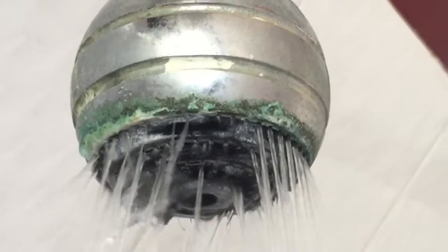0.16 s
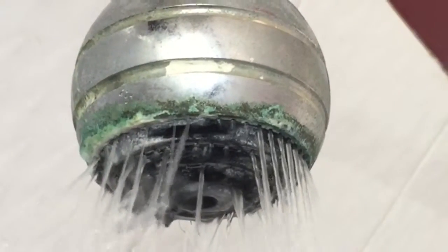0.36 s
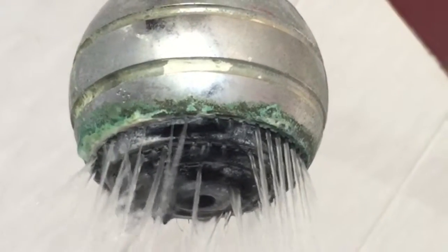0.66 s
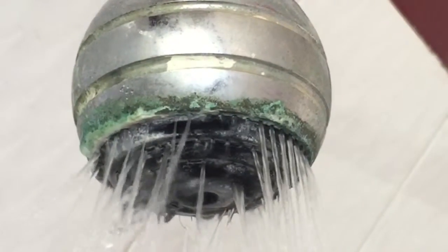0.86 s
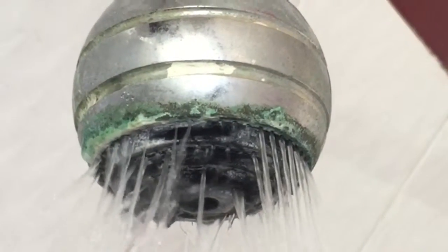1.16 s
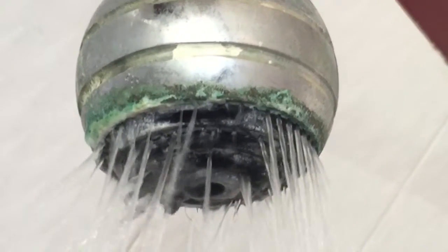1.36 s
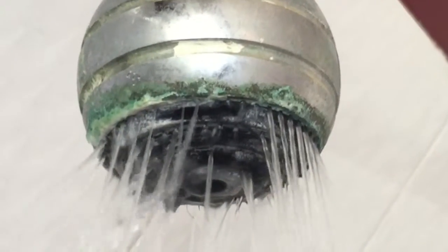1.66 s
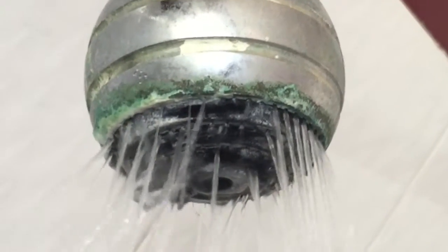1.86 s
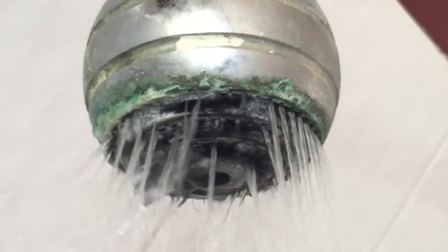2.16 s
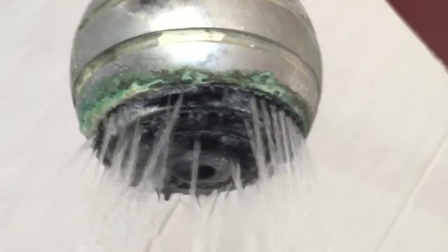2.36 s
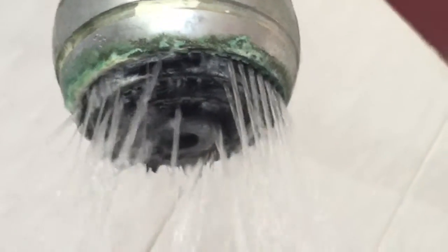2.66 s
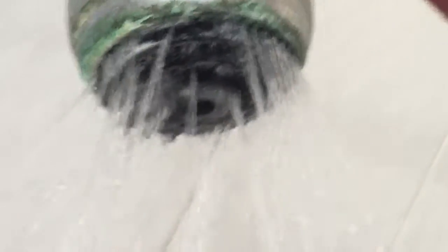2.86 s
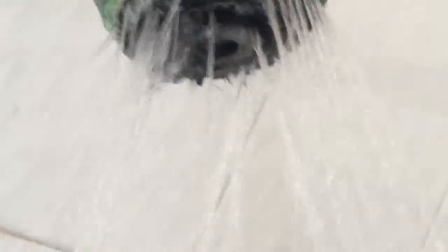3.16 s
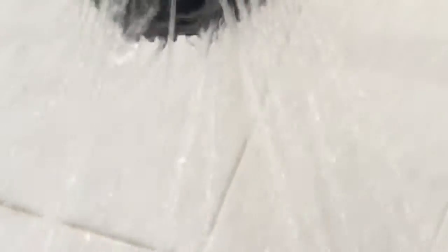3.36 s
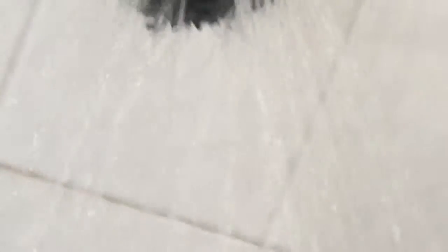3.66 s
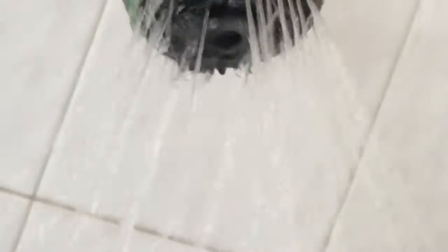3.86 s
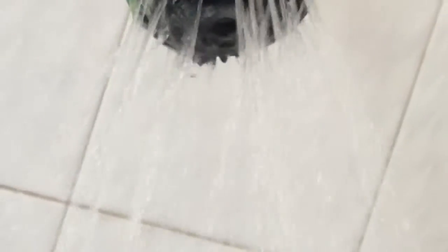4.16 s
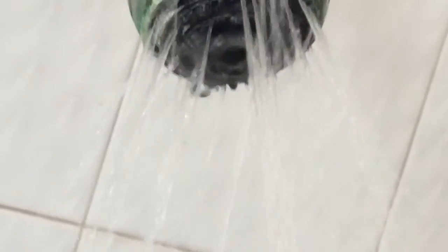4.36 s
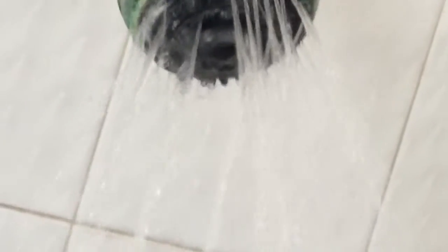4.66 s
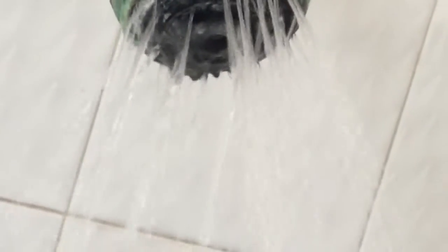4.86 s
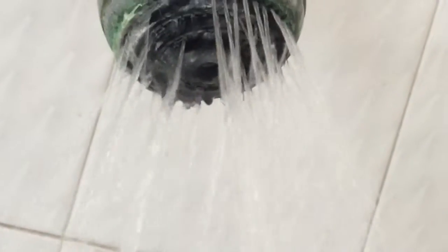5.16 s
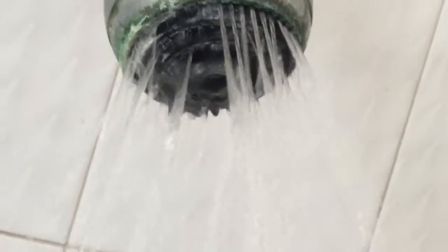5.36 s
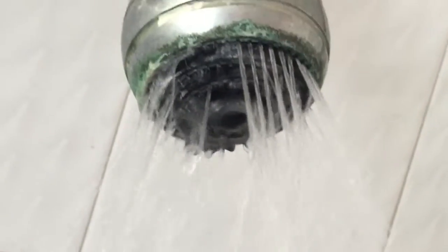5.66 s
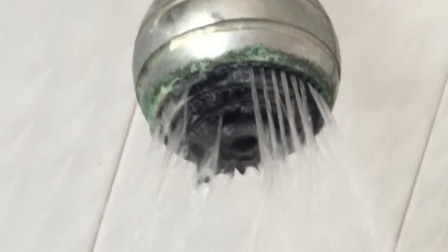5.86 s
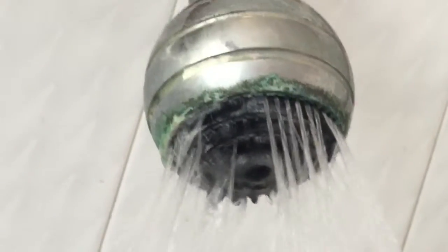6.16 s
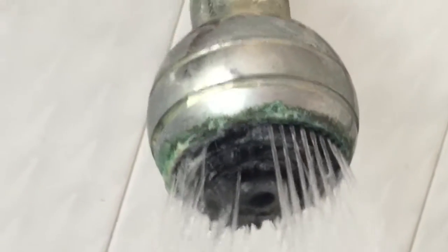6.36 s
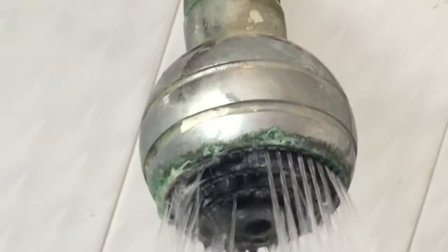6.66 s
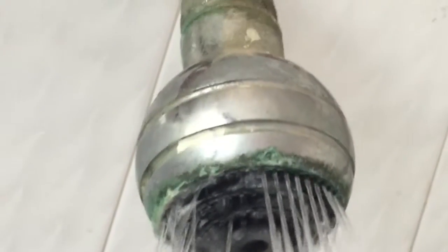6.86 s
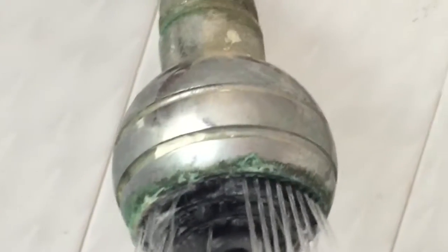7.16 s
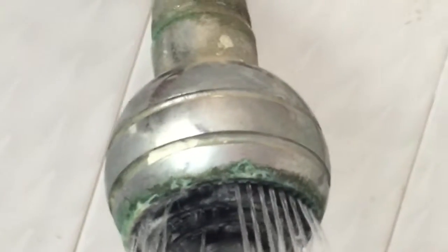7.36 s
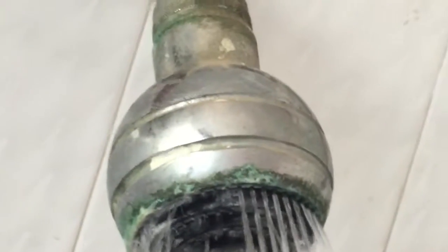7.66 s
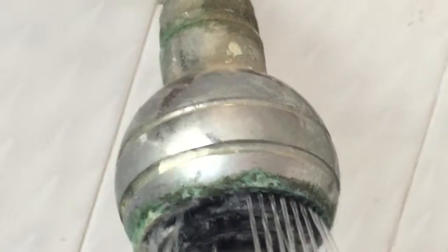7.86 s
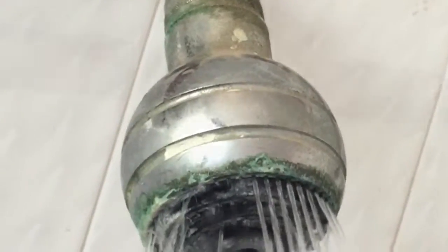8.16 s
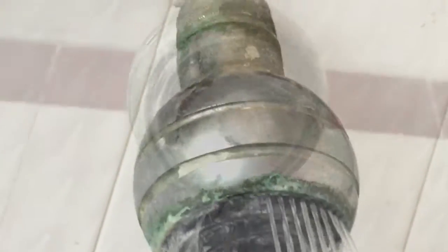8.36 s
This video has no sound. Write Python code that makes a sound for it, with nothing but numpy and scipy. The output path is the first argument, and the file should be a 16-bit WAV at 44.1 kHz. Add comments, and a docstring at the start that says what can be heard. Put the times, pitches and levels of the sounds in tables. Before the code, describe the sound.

Steady bright shower hiss and fine water patter, broken by sharp sputtering pops, with low rumble and a short tiled-room echo.

```python
"""A clogged shower head in a small tiled bathroom, heard by a phone held close.
From the first moment fine drops patter, jets hiss, low room modes rumble and air pockets burst at the holes as pops;
hard walls draw patter and pops out into a hissing tail. The pipe's faint sine whistle first swells after one second.
Stray drops fizz and plop on the phone at about 2.4, 2.6 and 4.5 s; near 3 s the jets sink briefly.
Patter is filtered clicks, hiss and fizz are filtered noise, pops are banded crackle and plops are rising sines."""
import sys
import numpy as np
from scipy import signal
from scipy.fft import rfft, irfft, next_fast_len
from scipy.io import wavfile
from scipy.ndimage import uniform_filter1d

SR = 44100
rng = np.random.default_rng(int(sys.argv[2]) if len(sys.argv) > 2 else 0)


def store_pcm(level_fs):
    """Save levels as 16-bit WAV."""
    pcm = np.round(np.clip(level_fs, -1, 1) * 32767).astype(np.int16)
    wavfile.write(sys.argv[1], SR, np.atleast_2d(pcm).T)


def amplitude_ratio(level_db):
    """Convert a level in decibels to the matching linear amplitude (field) ratio."""
    exponent = np.asarray(level_db, float) / 20
    return 10 ** exponent


N = 375732  # samples, about 8.5 s


def curve(points, hz):
    """Values of (Hz, value) points on a log-frequency axis."""
    f, v = np.transpose(points)
    return np.interp(np.log(np.maximum(hz, 1)), np.log(f), v)


def shape(x, gain):
    """Filter by a function of frequency."""
    size = next_fast_len(len(x) + 4096)
    hz = np.arange(size // 2 + 1) * SR / size
    return irfft(rfft(x, size) * gain(hz), size)[:len(x)]


def level(x, db):
    """Scale to an rms level."""
    return x * amplitude_ratio(db) / np.sqrt(np.mean(x ** 2))


def walk(rate):
    """Random levels held about 1 / rate s and slewed twice; spread near 1."""
    hold = int(SR / rate)
    steps = rng.standard_normal(N // 100)[np.arange(N) // max(hold, 101)]
    return 1.3 * uniform_filter1d(uniform_filter1d(steps, hold), hold)


# Low rumble of water in pipes and room. Each row: frequency in Hz, relative density in dB per Hz.
RUMBLE_COLOUR = [(24, -49), (40, -7.5), (81, -2.5), (129, -6), (160, 0), (212, -0.5), (246, -8),
                 (323, -7.5), (355, -14.5), (422, -9), (496, -12.5), (616, -8), (806, -12.5), (1000, -14),
                 (1300, -19), (2200, -120)]
# Room modes that stand out of it. Each row: frequency in Hz, width in Hz, rms level in dB before the swell.
ROOM_MODES = [(86.6, 4.7, -56), (108.5, 28, -57.5), (160.5, 17, -54), (210, 5.7, -60), (319.3, 2.9, -65)]


def rumble(rumble_db=-49, swell_db=1.2, cut_hz=36):
    """Broad low noise and narrow room modes fed by noise, swelling together."""
    def colour(hz):
        return amplitude_ratio(curve(RUMBLE_COLOUR, hz)) * hz ** 8 / (hz ** 8 + cut_hz ** 8)

    out = level(shape(rng.standard_normal(N), colour), rumble_db)
    for mode_hz, width_hz, db in ROOM_MODES:
        ring = shape(rng.standard_normal(N), lambda hz: 1 / (1 + (2 * (hz - mode_hz) / width_hz) ** 2))
        out = out + level(ring, db)
    return out * amplitude_ratio(swell_db * walk(4.7))


# The pipe's whistle at the phone. Each row: time in seconds, rms level in dB before the waver.
WHISTLE_LEVEL = [(0, -70), (1.05, -70), (1.12, -58), (1.35, -61), (1.5, -67), (2.3, -62), (2.6, -68),
                 (2.83, -59), (3, -69), (4.6, -67), (4.85, -59), (5.2, -62), (5.6, -64), (5.8, -70),
                 (8.52, -70)]


def whistle(whistle_hz=624, waver_db=3):
    """The pipe sings one sine whose pitch and level waver."""
    s, db = np.transpose(WHISTLE_LEVEL)
    pitch_hz = whistle_hz + 6 * walk(6) + 9 * walk(40)
    tone = np.sqrt(2) * np.sin(2 * np.pi * np.cumsum(pitch_hz) / SR)
    return tone * amplitude_ratio(np.interp(np.arange(N) / SR, s, db) + waver_db * walk(14))


# Colour shared by jets, patter and pops. Each row: frequency in Hz, relative level in dB.
SPRAY_COLOUR = [(700, -15.5), (1200, -5), (1700, -3.5), (2500, -3), (3800, -0.5), (6400, 3.5), (9000, 3.5),
                (12000, 1.5), (15500, 0.5)]
# Hiss of the jets as the flow wavers. Each row: time in seconds, rms level in dB before the flicker.
JET_LEVEL = [(0.0, -33), (0.92, -36), (1.49, -32.5), (1.8, -35), (2.49, -31.5), (2.75, -36), (2.96, -43),
             (3.11, -33), (5.5, -36.5), (5.81, -34), (6.43, -33.5), (6.55, -34.5), (6.93, -34),
             (8.52, -34.5)]


def hiss(flicker_db=1.03, low_hz=3760):
    """The jets tear out of the holes as coloured noise that fades below low_hz and follows the flow."""
    jets = shape(rng.standard_normal(N), lambda hz: amplitude_ratio(curve(SPRAY_COLOUR, hz)) * hz / np.hypot(hz, low_hz))
    s, db = np.transpose(JET_LEVEL)
    return level(jets, 0) * amplitude_ratio(np.interp(np.arange(N) / SR, s, db) + flicker_db * walk(6.5))


def patter(count=25000, scatter_db=4, patter_db=-60, rarest_drop=.002):
    """Fine drops strike tile and water film: dense clicks of uneven size, levelled ahead of the room."""
    moment, size, side = rng.random((count, 3)).T
    # the chance of the largest drop caps the sizes
    strength = amplitude_ratio(-scatter_db * np.log(np.maximum(size, rarest_drop)))
    drops = np.zeros(N)
    np.add.at(drops, (moment * N).astype(int), np.sign(side - .5) * strength)
    return level(shape(drops, lambda hz: amplitude_ratio(curve(SPRAY_COLOUR, hz))), patter_db)


# Bubbles left by drops on the phone.
# Each row: start in seconds, starting pitch in Hz, level in dB of half the peak before attack and decay.
PLOP_BUBBLES = [(2.368, 1234, -35.5), (2.605, 1360, -35), (4.456, 1210, -39), (4.518, 1930, -35)]


def plops(t60_s=.035, rise_per_s=5, attack_ms=2):
    """Each bubble rings briefly and rises as it nears the surface."""
    out = np.zeros(N)
    t = np.arange(SR // 10) / SR
    for s, hz, db in PLOP_BUBBLES:
        fade = (1 - np.exp(-1000 * t / attack_ms)) * amplitude_ratio(db - 60 * t / t60_s)
        ring = np.sin(2 * np.pi * hz * t * (1 + rise_per_s * t / 2))
        start = int(s * SR)
        out[start:start + len(t)] += 2 * fade * ring
    return out


# Drops hitting the phone. Each row: start in seconds, length in ms, rms level in dB before the roughness.
PHONE_HITS = [(2.3687, 5.1, -24), (2.414, 5.3, -30), (2.6038, 20.6, -21), (2.6225, 3.6, -36),
              (4.458, 2.4, -15.5), (4.462, 6.9, -24), (4.517, 7.3, -29)]
# Colour of their fizz at the phone. Each row: frequency in Hz, relative level in dB.
FIZZ_COLOUR = [(800, -28), (1350, -10), (1600, -14), (7000, -12), (10000, -2), (12500, 0), (15500, -7)]


def splats(edge_ms=.7, rough_db=1.5):
    """Stray drops break up on the phone itself: short gated noise, dry and fizzy."""
    t_ms = np.arange(N) / SR * 1000
    fizz = level(shape(rng.standard_normal(N), lambda hz: amplitude_ratio(curve(FIZZ_COLOUR, hz))), 0)
    gate = np.zeros(N)
    for s, length_ms, db in PHONE_HITS:
        to_edge_ms = np.minimum(t_ms - 1000 * s, 1000 * s + length_ms - t_ms)
        gate += amplitude_ratio(db) * np.clip(to_edge_ms / edge_ms, 0, 1)
    return fizz * gate * amplitude_ratio(rough_db * walk(440))


def bursts(table, size=4096, ripple_db=1.5, ripple_hz=500, band_reach=1.636):
    """Each pocket bursts with a click or sputters out over some ms; its size sets the band it sounds in."""
    s, db, pitch_hz, half_width_oct, sputter_ms = np.transpose(table)[:, :, None]
    hz = np.maximum(np.arange(size // 2 + 1), 1) * SR / size
    lead = size // 8
    t = (np.arange(size) - lead) / SR
    chance = rng.standard_normal((len(table), size))
    decay = np.exp(-1000 * np.abs(t) / np.maximum(sputter_ms, .1)) * (t > 0)
    push = chance ** 3 / 10 * decay  # sparse crackle
    push[:, lead] = 2 * np.sign(chance[:, 0])  # the opening click
    timing = rfft(push)
    timing /= np.abs(timing)  # the crackle sets when the energy comes, the pocket sets its colour
    # band_reach: half widths out to where the flat band falls away
    off = np.log2(hz / pitch_hz) / (band_reach * half_width_oct)
    bell = 1 / (1 - off ** 2 + 1j * np.sqrt(2) * off)  # a pair of close resonances: flat top, steep edges
    tint = amplitude_ratio(db + curve(SPRAY_COLOUR, hz) - curve(SPRAY_COLOUR, pitch_hz))
    # several bubbles share a pocket, so its band is uneven
    bins = max(int(ripple_hz * size / SR), 2)
    ripple = uniform_filter1d(rng.standard_normal(timing.shape), bins)
    ripple = uniform_filter1d(ripple, bins) * np.sqrt(bins)
    sounds = irfft(timing * bell * tint * amplitude_ratio(ripple_db * ripple), size)
    out = np.zeros(N + 2 * size)
    starts = (s[:, 0] * SR).astype(int) + size - lead
    for start, sound in zip(starts, sounds):
        out[start:start + size] += sound
    return out[size:size + N]


def small_pops(count=300, loudest_db=-16.5, scatter_db=10):
    """Many lesser pockets of any size burst at chance moments."""
    moment, quiet, high, wide, slow = rng.random((count, 5)).T
    db = loudest_db - scatter_db * quiet
    pitch_hz = 3500 * 2 ** (2.2 * np.sqrt(high))  # the tiniest, highest ones are the most common
    half_width_oct = .15 + .17 * wide
    sputter_ms = 6 * slow
    return bursts(np.c_[moment * N / SR, db, pitch_hz, half_width_oct, sputter_ms])


# Air pockets bursting at the holes, close to the phone.
# Each row: start in seconds, spectral peak in dB before ripple and room, pitch in Hz,
# half width in octaves, sputter decay in ms.
POCKETS = [(0.0, -6.5, 3500, 0.31, 3.8), (0.0704, -18, 13900, .6, 8), (0.106, -13, 4900, 0.73, 0.81),
           (0.2166, -9, 3630, 0.34, 5), (0.2775, -5, 2800, 0.28, 4.6), (0.3555, -2, 2880, 0.27, .6),
           (0.4317, -7.5, 3900, 0.33, 1.3), (0.483, -9, 3360, 0.27, 0.71), (0.5906, -10, 6800, 0.91, 1.6),
           (0.88, -17, 6400, 0.55, 16), (0.8969, -5, 3200, 0.35, 4.6), (1.1008, -10, 6470, 0.38, 9),
           (1.1804, -8.5, 9190, 0.65, 1.2), (1.3624, -9, 4520, 0.35, 1.6), (1.4418, -6, 5700, 0.42, .5),
           (1.4962, -7.5, 2980, 0.4, 1.2), (1.574, -9.5, 4360, 0.34, 1.1), (1.6324, -14, 11310, 0.8, 5),
           (1.7029, -17, 7210, 0.38, 1), (1.8209, -8, 3460, .25, 1.9), (2.0127, -6, 4760, 0.48, 0.81),
           (2.0424, -4.5, 2520, 0.29, 1.2), (2.075, -3, 4400, 0.39, 6.8), (2.1413, -5, 3840, 0.31, 0.9),
           (2.2341, -19, 9190, 0.64, 1), (2.295, -16, 4590, 0.47, 6), (2.3525, -3, 3550, 0.49, 2.3),
           (2.3679, -2.5, 2510, 0.052, 0.87), (2.418, -9.5, 13450, 0.33, 5.5),
           (2.4768, -4.5, 2960, 0.34, 3.5), (2.5285, -2.5, 3450, 0.36, 5.1), (2.626, -14, 10560, .93, 7.4),
           (2.7959, -8, 3400, 0.24, 3.7), (2.7979, -15, 13450, .2, 1), (2.9284, -6.5, 10200, 0.82, 100),
           (2.9771, 0.5, 2600, 0.27, .3), (3.0304, -7, 8800, 0.59, 0.85), (3.2034, -14.5, 5500, 0.79, 13),
           (3.256, -11.5, 4300, 0.39, 1.4), (3.3359, -13.5, 1610, 0.5, 16), (3.3643, -13, 1350, 0.081, 1.2),
           (3.442, -14, 4270, 0.13, 2.3), (3.4748, -12, 11310, 1, 1.2), (3.628, -17, 9510, 1, 1),
           (3.7393, -3, 11700, 0.26, .45), (3.7665, -11, 3350, 0.38, 0.46),
           (3.8098, -16.5, 2530, 0.79, 1.1), (3.8447, -3, 3130, 0.093, 4), (3.9879, -22, 11310, 0.46, 1.2),
           (4.077, -12.5, 4300, 0.35, 1), (4.1414, -2.8, 3200, 0.23, .6), (4.1647, -10.5, 7800, 0.72, .9),
           (4.2818, -14, 4590, 0.67, .8), (4.3439, -9.5, 6730, 0.23, 1.1), (4.446, -10.5, 10600, 1, 5.9),
           (4.5961, -1.5, 3980, 0.3, .4), (4.9088, -11.5, 7210, 0.8, 0.54), (5.0806, -4.5, 5500, 0.6, .43),
           (5.161, -8, 4640, 0.18, .5), (5.3433, -15.5, 5470, 0.65, 6.3), (5.4964, -17, 12500, 0.49, 2.7),
           (5.6125, -11, 11310, .67, 11), (5.6511, -8.5, 3420, 0.29, 5.8), (5.7, -12.5, 3970, 0.38, 8),
           (5.7846, -14, 12130, 0.38, 1), (5.93, -11, 6500, 0.57, 8), (5.9426, -4.5, 4300, 0.36, 31),
           (6.0297, -12, 4220, 0.53, 1.2), (6.196, -11, 3650, 0.19, 2), (6.225, -12, 4140, .38, 2.5),
           (6.2697, 0.5, 2520, 0.24, 0.34), (6.3213, -17.5, 2430, 0.94, 6.1), (6.322, -8.5, 6500, 0.37, 1),
           (6.4923, -4.5, 3570, 0.35, 0.45), (6.4982, -9, 10560, 0.28, 0.87),
           (6.6736, -8.5, 3500, 0.3, 2.5), (6.707, -5, 6700, .3, 2.2), (6.7879, -10.5, 6900, 0.61, 16),
           (6.8582, -13, 11900, .72, 1), (7.0602, -12.5, 6730, 0.64, 1.2), (7.1078, -17, 2260, 0.53, 4.4),
           (7.1529, -13.5, 13450, .95, .75), (7.2378, -8, 5280, 0.64, 15), (7.3171, -9.5, 5280, 0.42, 1.1),
           (7.4581, -10, 4800, 0.45, 1.1), (7.532, -13.5, 2750, 0.53, 4.1), (7.5896, -9, 5150, 0.25, 2),
           (7.708, -14.5, 13450, 0.55, 2), (7.7199, -12, 2480, 0.14, 1.6), (7.7215, -8, 4360, .19, 0.85),
           (7.8651, -12.5, 8500, .72, 9.4), (7.9327, -13, 4800, 0.59, 0.89), (8.101, -8.5, 4950, 0.28, 13),
           (8.2074, -13, 4470, 0.69, 0.92), (8.2693, -13, 10930, 0.96, 4.2),
           (8.4792, -16.5, 13000, 0.27, 1)]


def pops():
    """The larger air pockets burst at the nozzle holes, each at its own moment and pitch."""
    return bursts(POCKETS)


# First clear paths from the shower head to the phone.
# Each row: delay in ms before the hand's drift, level in dB.
FIRST_PATHS = [(0, 2), (.65, 3), (3.4, 0), (7.4, -5), (13.3, -1), (19, -5)]
# Reverberation of the tiled room. Each row: frequency in Hz, time to fall by 60 dB in seconds.
ROOM_DECAY = [(1200, 0.77), (2400, 0.8), (4800, 0.6), (9600, 0.44), (15000, 0.2)]


def bathroom(x, tail_db=-14.5, rise_ms=3, grain_ms=40, drift=0.049, size=4096):
    """A few clear paths, then echoes that thicken and fade, treble first; the hand drifts, so they change."""
    t = np.arange(SR * 4 // 5) / SR
    noise, gate = rng.standard_normal((2, len(x) + len(t)))
    bands = []
    for k in range(len(ROOM_DECAY)):
        share = [(f, float(j == k)) for j, (f, _) in enumerate(ROOM_DECAY)]  # one band, crossfaded
        bands.append(shape(noise, lambda hz: curve(share, hz)))
    bands = np.array(bands)
    rise = 1 - np.exp(-(1000 * t / rise_ms) ** 2)
    fades = amplitude_ratio(tail_db - 60 * t / np.array(ROOM_DECAY)[:, 1:]) * rise
    out = np.zeros(len(x) + len(t) + size)
    for i in range(0, len(x), size):
        lumpy = amplitude_ratio(4 * gate[i:i + len(t)] * np.exp(-1000 * t / grain_ms))  # early echoes are uneven
        lumpy /= np.sqrt(uniform_filter1d(lumpy ** 2, 400))
        tail = lumpy * np.sum(bands[:, i:i + len(t)] * fades, axis=0)
        for ms, db in FIRST_PATHS:
            delay_ms = abs(ms * (1 + drift * gate[i]))
            tail[int(delay_ms * SR / 1000)] += amplitude_ratio(db)
        heard = signal.fftconvolve(x[i:i + size], tail)
        out[i:i + len(heard)] += heard
    return out[:len(x)]


def scene():
    """Pops and patter ring through the room; the other sounds join dry, alike in both channels."""
    drops, lead = patter(), SR // 2
    # the patter has been running, so the room is already full of it
    sources = np.r_[drops[-lead:], drops + pops() + small_pops()]
    room = bathroom(sources)[lead:]
    return np.tile(room + splats() + plops() + hiss() + rumble() + whistle(), (2, 1))


# Dips of the phone's microphone in its housing.
# Each row: frequency in Hz, width in Hz, depth in dB (negative is a cut).
HOUSING_DIPS = [(4910, 370, -4), (7670, 1700, -3.5), (10440, 1200, -5)]


def microphone(x, top_hz=15830):
    """The housing dips colour the treble and everything from top_hz up is cut."""
    def response(hz):
        dips_db = sum(db / (1 + (2 * (hz - f) / width) ** 2) for f, width, db in HOUSING_DIPS)
        return amplitude_ratio(dips_db) * (hz < top_hz)

    return shape(x, response)


def top_cut(x):
    """Nothing passes above the cut-off."""
    return signal.sosfilt(signal.butter(12, 17000, fs=SR, output="sos"), x)


def record(dry):
    """One microphone feeds both channels."""
    mix = np.tile(microphone(dry[0]), (2, 1))
    return top_cut(mix)


dry = scene()
out = record(dry)
store_pcm(out)
```